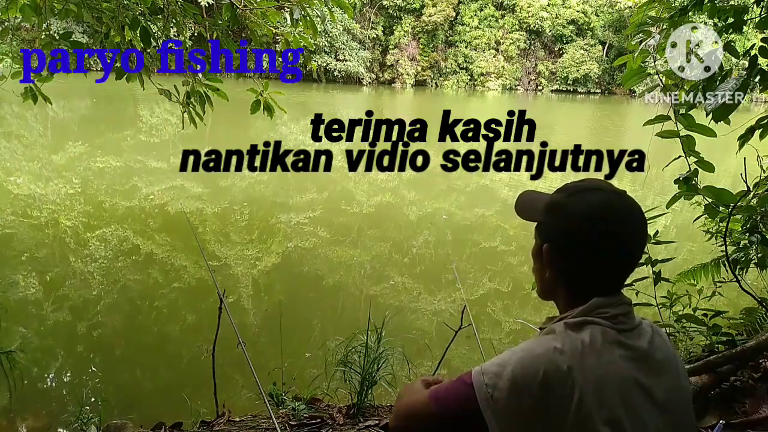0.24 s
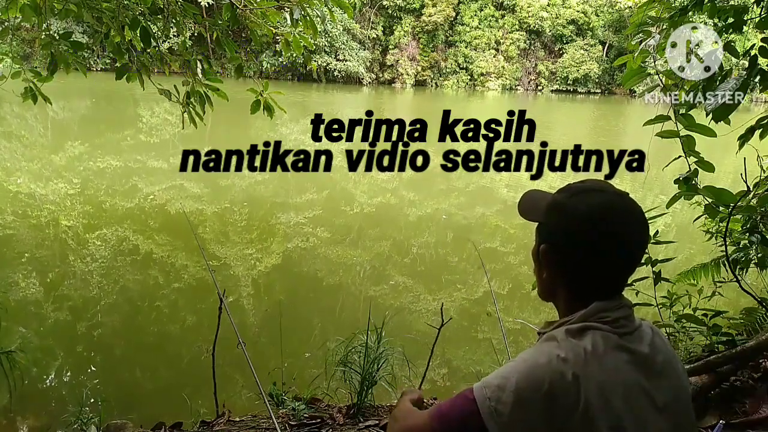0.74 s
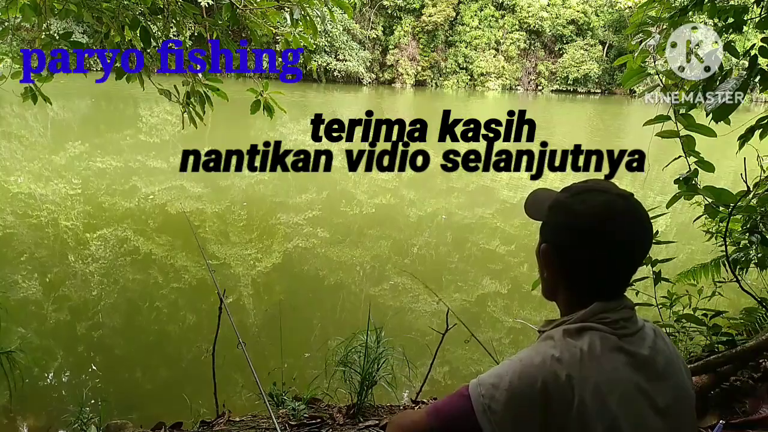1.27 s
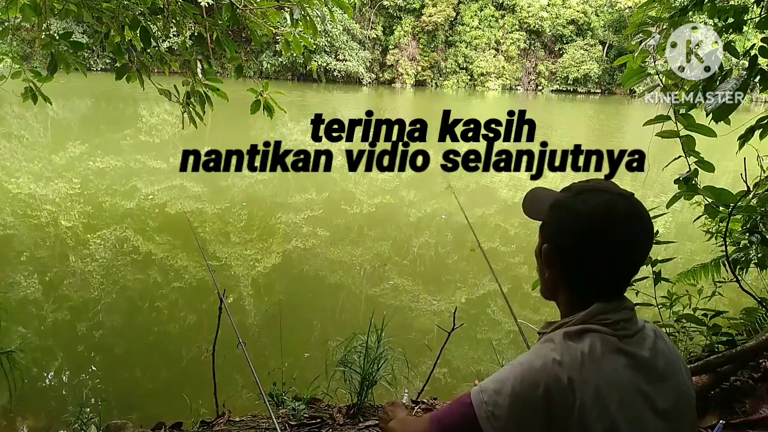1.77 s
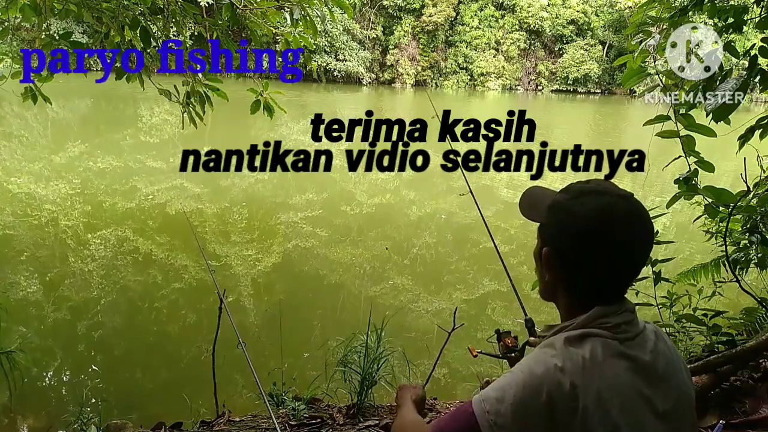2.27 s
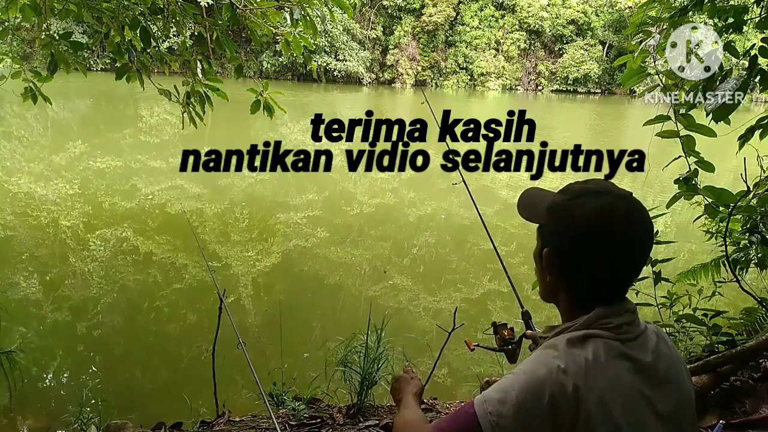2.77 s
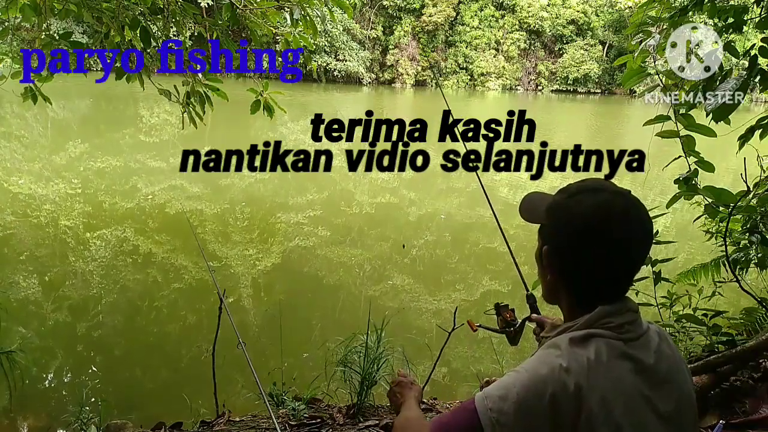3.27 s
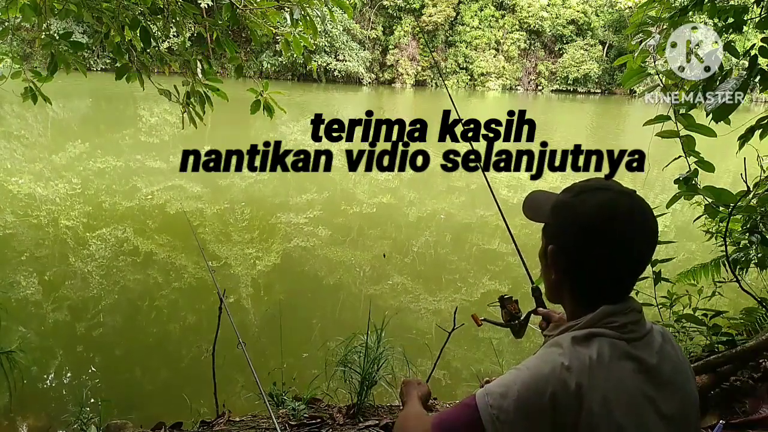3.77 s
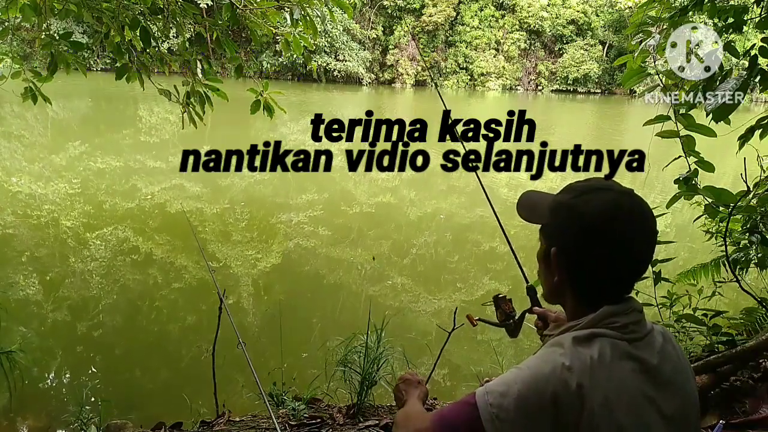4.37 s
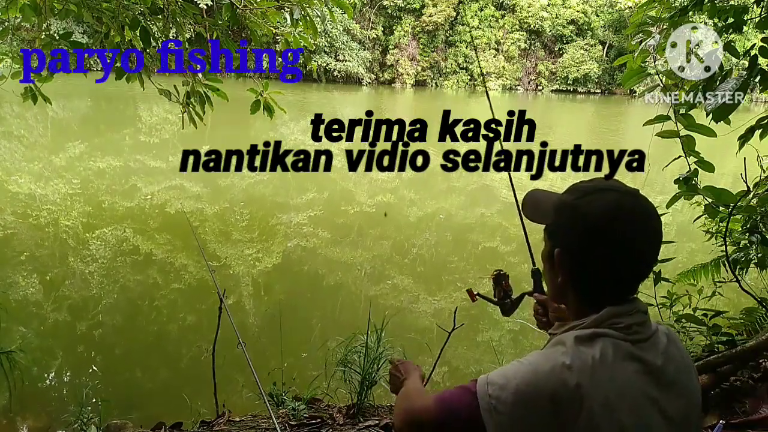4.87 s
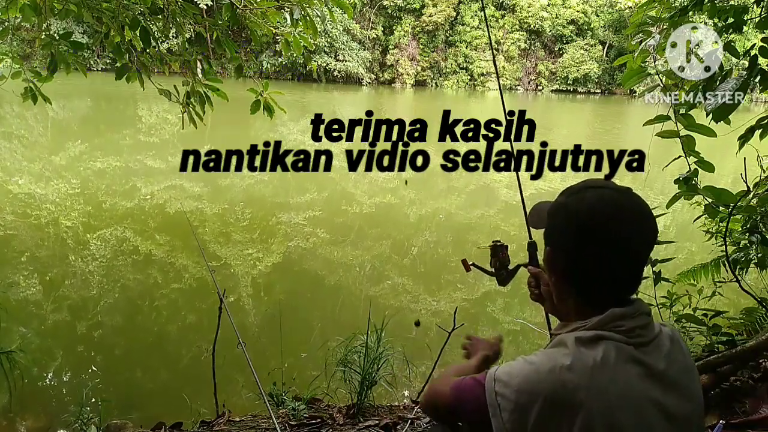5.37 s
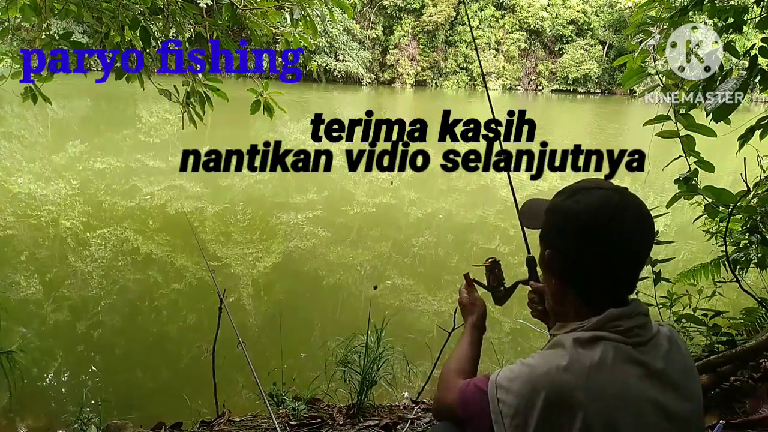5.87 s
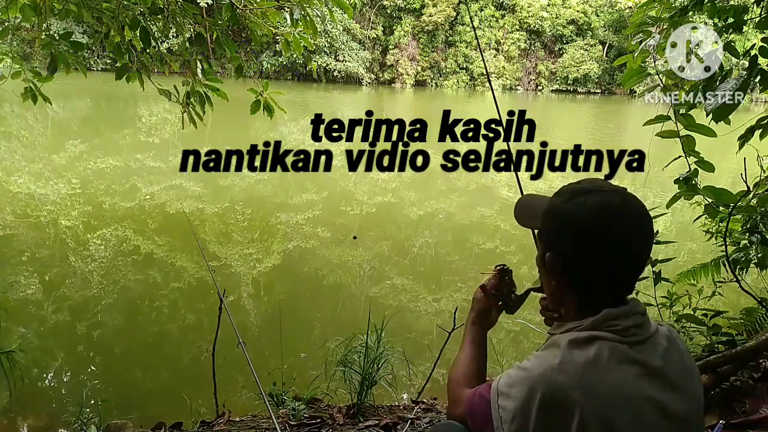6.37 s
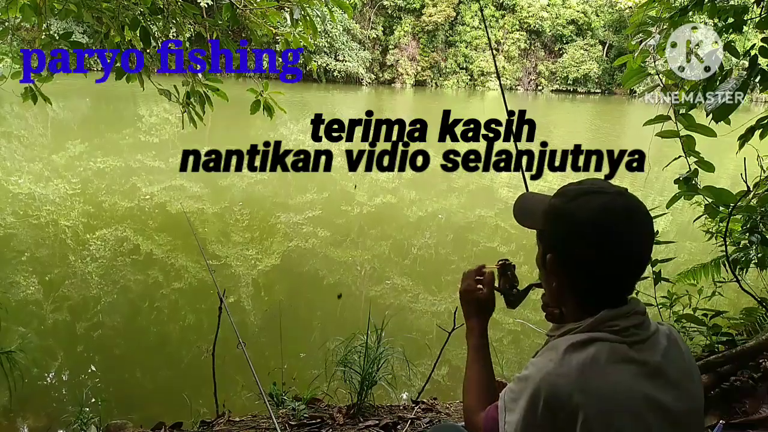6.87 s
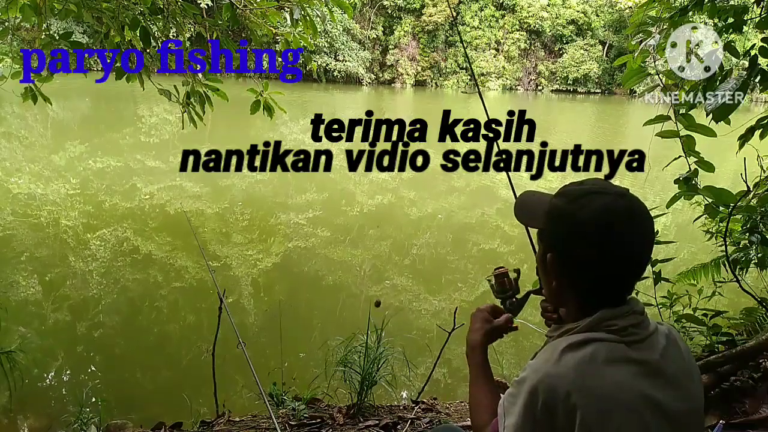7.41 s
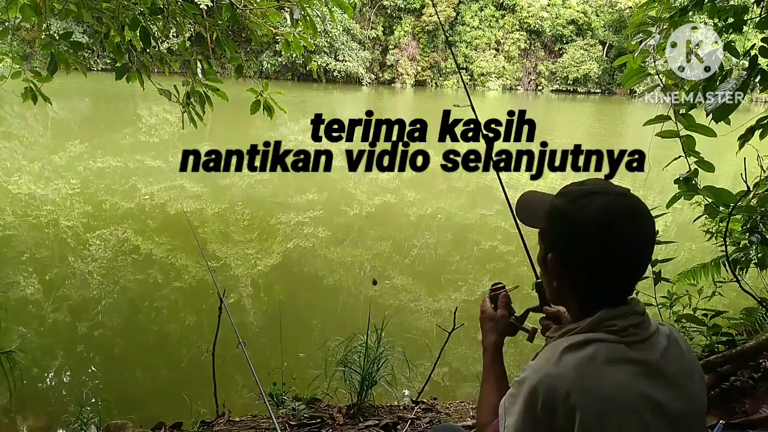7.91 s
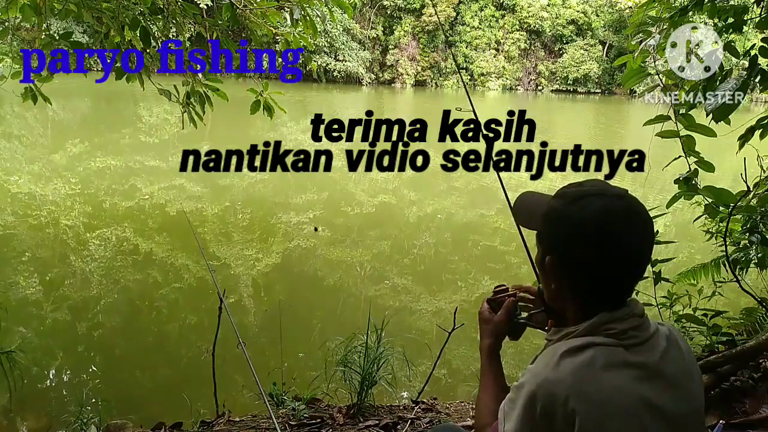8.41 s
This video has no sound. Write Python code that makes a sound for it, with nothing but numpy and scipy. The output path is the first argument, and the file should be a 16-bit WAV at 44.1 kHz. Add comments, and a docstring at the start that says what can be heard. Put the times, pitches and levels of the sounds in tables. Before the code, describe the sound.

A steady high insect buzz fills a lakeside forest, with repeated bird whistles, a brief chuckling call and a low rumble of air.

```python
"""Insects and birds at a forest lake

Crickets trill with their wings and cicadas drone with their tymbals, over a low rumble of moving air.
One bird repeats a chip and a high falling whistle; a second calls lower notes, and a third slurs
and chuckles. An angler's tackle knocks softly near by. Trunks and leaves scatter the birds' calls
and the knocks into reverberation."""
import sys
import numpy as np
from scipy import signal
from scipy.fft import rfft, irfft, next_fast_len
from scipy.io import wavfile
from scipy.ndimage import map_coordinates

SR = 44100
rng = np.random.default_rng(int(sys.argv[2]) if len(sys.argv) > 2 else 0)


def persist_wave(psi):
    """Save psi, clipped to +-1, as 16-bit WAV."""
    counts = np.round(np.clip(psi, -1, 1) * 32767).astype(np.int16)
    wavfile.write(sys.argv[1], SR, np.atleast_2d(counts).T)


N = 381465


def amp(db):
    """Decibels to amplitude ratio."""
    return 10 ** (np.asarray(db) / 20)


def unit(x):
    """Normalisation to rms 1."""
    return x / np.sqrt(np.mean(x ** 2) + 1e-20)


def clock(length):
    """Sample times over a length in seconds."""
    return np.arange(round(length * SR)) / SR


def along(points, hz):
    """Interpolation on a logarithmic frequency axis."""
    freqs, values = np.transpose(points)
    return np.interp(np.log(hz + 1), np.log(freqs + 1), values)


def curves(rows, t):
    """Linear interpolation at t of each column after the first."""
    times, *columns = np.transpose(rows)
    return [np.interp(t, times, column) for column in columns]


def wobble(rate):
    """Smooth random modulation, with rate knots a second."""
    return map_coordinates(rng.standard_normal(int(N * rate / SR) + 4), [np.arange(N) * rate / SR])


def swell(t, crest_s, rise_s, fall_s):
    """Exponential growth to 1 at the crest, then exponential decay."""
    return np.exp(np.minimum((t - crest_s) / rise_s, (crest_s - t) / fall_s))


def phase(hz):
    """Phase is the time integral of frequency."""
    return 2 * np.pi * np.cumsum(hz) / SR


def add(track, s, sound):
    """Superposition of a sound on a track at time s."""
    part = track[max(round(s * SR), 0):][:len(sound)]
    part += sound[:len(part)]


def filtered(x, response):
    """Filtering multiplies the spectrum by a frequency response."""
    size = next_fast_len(N + 8192)
    return irfft(rfft(x, size) * response(np.fft.rfftfreq(size, 1 / SR)), size)[..., :N]


def bell(hz, centre, width):
    """A Gaussian power spectrum of area 1; width is taken at half power."""
    sigma = width / np.sqrt(8 * np.log(2))
    return np.exp(-((hz - centre) / sigma) ** 2 / 2) / (sigma * np.sqrt(2 * np.pi))


def panned(x, left_db):
    """An interaural level difference: louder on the left by left_db."""
    return x * amp([[left_db / 2], [-left_db / 2]])


# Likeness of the two channels. Each row: frequency in Hz, correlation coefficient.
COHERENCE = [(30, -0.086), (65, 0.63), (130, 0.078), (500, 0.2), (1200, -0.066), (3000, 0.029),
             (10000, 0.019)]
def diffuse(gain):
    """A diffuse field: noise of rms 1 from all round, only partly coherent between the ears."""
    def response(hz):
        angle = np.arccos(np.clip(along(COHERENCE, hz), -1, 1)) / 2
        return gain(hz) * np.array([np.cos(angle), np.sin(angle)])
    mid, side = filtered(rng.standard_normal((2, N)), response)
    return unit(np.array([mid + side, mid - side]))


def broadband(spectrum):
    """Diffuse noise coloured by a spectrum in dB."""
    return diffuse(lambda hz: amp(along(spectrum, hz)))


def narrowband(centre_hz, width_hz):
    """Diffuse noise confined to one Gaussian band."""
    return diffuse(lambda hz: np.sqrt(bell(hz, centre_hz, width_hz)))


# The forest's decay. Each row: frequency in Hz, reverberation time in seconds.
FOREST_T60 = [(300, 0.13), (1000, 1), (4000, 1), (10000, 0.072)]
def forest(x, direct_db, echo_db, build_s=0.003):
    """Reverberation: scattering by trunks and leaves builds a decaying tail behind the direct sound."""
    hz, t, noise = signal.stft(rng.standard_normal((2, SR)), SR, nperseg=256)
    envelope = amp(-60 * t / along(FOREST_T60, hz)[:, None]) * (1 - np.exp(-t / build_s))
    tail = signal.istft(noise * envelope, SR, nperseg=256)[1]
    echo = signal.fftconvolve(x[None], tail / np.linalg.norm(tail[0]), axes=1)[:, :N]
    return amp(direct_db) * x + amp(echo_db) * echo


# Two spectra of moving air. Each row: frequency in Hz, relative spectral density in dB.
RUMBLE_SPECTRUM = [(4, 8), (10, 2), (20, -4.5), (30, -4.5), (45, -10), (100, -28.5), (220, -50),
                   (400, -103)]
RUSH_SPECTRUM = [(50, -9.5), (130, 3.5), (250, -2.5), (430, -5.5), (680, -12.5), (1200, -20), (2500, -32.5),
                 (6000, -60)]
def moving_air(t):
    """Flow noise: a randomly modulated rumble and a soft rush, both slowly easing."""
    rumble = amp(-45 - 0.12 * t) * unit(amp(1.64 * wobble(14)) * broadband(RUMBLE_SPECTRUM))
    rush = amp(-61 - 0.3157 * t) * broadband(RUSH_SPECTRUM)
    return panned(rumble, left_db=3.5 * -1) + panned(rush, left_db=-0.5)


# The drone's colour. Each row: frequency in Hz, relative spectral density in dB.
DRONE_SPECTRUM = [(25, -28), (45, -4), (62, -3), (75, -3.5), (92, -12), (130, -18), (260, -54.5),
                  (400, -95)]
# Its envelope. Each row: time in seconds, relative level in dB.
DRONE_ENVELOPE = [(0.0, -55), (0.58, -59), (1.88, -55.5), (1.93, -61), (2.36, -55), (5.03, -55.5),
                  (5.47, -59.5), (8.65, -56)]
def far_drone(t):
    """Low-frequency noise whose level dips now and then."""
    gain = amp(curves(DRONE_ENVELOPE, t)[0] + 0.5)
    return panned(gain * broadband(DRONE_SPECTRUM), left_db=-3.5)


# Distant insects. Each row: frequency in Hz, relative spectral density in dB.
CHORUS_SPECTRUM = [(600, -32), (1300, -7.5), (1900, -3), (2500, -1.5), (2850, 0), (3200, 2), (3750, 2),
                   (4100, -2.5), (4600, -4.5), (6000, -6), (8600, -2), (10100, -3.5), (10800, -19),
                   (11400, -64)]
def far_insects(t):
    """Incoherent summation: countless insects merge into a hiss, and a crowd of crickets swells once."""
    chorus = amp(-63) * broadband(CHORUS_SPECTRUM)
    crowd_gain = amp(-82) + amp(-66) * swell(t, crest_s=1.3, rise_s=1.1, fall_s=0.79)
    return chorus + crowd_gain * narrowband(3570, width_hz=380)


def far_cicada(t):
    """A distant rasp: narrowband noise that grows and decays exponentially."""
    return amp(-72.5) * swell(t, crest_s=6.3, rise_s=0.57, fall_s=0.41) * narrowband(5760, width_hz=330)


# The whine's envelope. Each row: time in seconds, relative level in dB.
SIREN_ENVELOPE = [(0.0, -76.5), (0.82, -70.5), (1.59, -72.5), (3.81, -68.5), (8.55, -69.5), (8.65, -68)]
def siren_cicada(t, centre_hz=9225, sink_hz_per_s=13, swing_hz=75, period_s=1.63, crest_s=3.48):
    """Frequency modulation: a narrow whine swings slowly up and down while it sinks."""
    shift_hz = swing_hz * np.cos(2 * np.pi * (t - crest_s) / period_s) - sink_hz_per_s * t
    analytic = signal.hilbert(narrowband(centre_hz, width_hz=150))
    whine = np.real(analytic * np.exp(1j * phase(shift_hz)))
    return amp(curves(SIREN_ENVELOPE, t)[0] + 5) * whine


def throbbing_cicada(beat_hz=19.6, throb_db=0.84, buzz_db=1.5):
    """Amplitude modulation: tymbal clicks blur into a band that throbs, four or five clicks a beat."""
    beat = phase(beat_hz * (1 + 0.0078 * wobble(2.7)))
    modulation_db = throb_db * np.cos(beat) + buzz_db * (np.cos(4 * beat) + np.cos(5 * beat)) / 2
    band = narrowband(7370, width_hz=800)
    return panned(amp(-57) * unit(band * amp(modulation_db)), left_db=3)


def wing_tones(rows):
    """Multipath propagation through the trees smears each wing tone into a fluttering line."""
    def density(hz):
        return sum(amp(db) ** 2 * bell(hz, centre, width) for centre, width, db in rows)
    power = sum(amp(db) ** 2 for _, _, db in rows)
    return np.sqrt(power) * diffuse(lambda hz: np.sqrt(density(hz)))


# Spectral lines of the songs. Each row: frequency in Hz, line width in Hz, relative level in dB. # The high
# lines also hold a steady line near 8.9 kHz, just below the siren cicada's whine.
LOW_CRICKET_LINES = [(2973, 43, 1), (3020.5, 36, -1)]
TRILL_LINES = [(5202, 20, -3), (5303, 46, -5), (5040, 30, -14), (5270, 52, -11)]
KATYDID_LINES = [(14211, 18, -2), (14255, 40, -7), (14170, 20, -9)]
HIGH_LINES = [(8870, 150, -77), (9800, 160, -89), (13426, 50, -85.5), (13647, 27, -84.5), (14200, 57, -90),
              (13800, 840, -81.5)]
# Envelopes of two of these songs. Each row: time in seconds, relative level in dB.
LOW_CRICKET_ENVELOPE = [(0, -63.5), (2, -65), (4.3, -64), (5, -63.5), (6.4, -64), (8.65, -65.5)]
KATYDID_ENVELOPE = [(0.0, -84), (0.07, -82), (2.84, -83), (2.94, -81), (4.26, -86), (4.5, -75), (5.28, -87),
                    (5.85, -80), (7.39, -89), (7.61, -80), (7.73, -86), (8.65, -74)]
def wing_singers(t, settle_s=3):
    """Stridulation: loud low crickets, a thin trill that settles and a katydid; steady high lines ring beside
    them, one just below the siren cicada's whine."""
    low = amp(curves(LOW_CRICKET_ENVELOPE, t)[0]) * wing_tones(LOW_CRICKET_LINES)
    trill = amp(-74 + 7 * np.exp(-t / settle_s)) * wing_tones(TRILL_LINES)
    katydid = amp(curves(KATYDID_ENVELOPE, t)[0] + 5.5) * wing_tones(KATYDID_LINES)
    return low + trill + katydid + wing_tones(HIGH_LINES)


# Nearer crickets. Each row: frequency in Hz, relative level in dB.
NEAR_TONES = [(3357, -77.5), (3408, -75), (3457, -76), (3548, -70.5), (3569, -76), (3681, -84)]
# They ease off and return. Each row: time in seconds, gain in dB.
NEAR_ENVELOPE = [(0, 3.5), (3.2, 2.5), (5.1, -0.5), (6.2, -1), (6.8, 3), (8.65, 2)]
def near_crickets(t, wander_hz=4, fade_db=1.5):
    """Almost sinusoidal wing tones that wander and fade independently at each ear."""
    def ear(hz):
        fading = amp(fade_db * wobble(4))
        angle = phase(hz + wander_hz * wobble(25)) + rng.uniform(-0.42, 1)
        return unit(fading * np.sin(angle))
    tones = sum(amp(db) * np.array([ear(hz), ear(hz)]) for hz, db in NEAR_TONES)
    return amp(curves(NEAR_ENVELOPE, t)[0]) * tones


def chirping_cricket(t, wing_hz=5249, chirp_hz=8.94, last_s=0.57):
    """Full amplitude modulation cuts a wing tone into slightly uneven chirps, which stop early on."""
    cycle = 2 * np.pi * chirp_hz * (t - last_s) + 0.5 * wobble(5.3)
    chirps = (1 + np.cos(cycle)) / 2 * (t < last_s + 0.5 / chirp_hz)
    wing = np.sin(2 * np.pi * wing_hz * t)
    return forest(amp(-65) * chirps * wing, direct_db=1, echo_db=-11)


# Knocks of the tackle. Each row: start in seconds, ring frequency in Hz, relative level in dB.
TACKLE_KNOCKS = [(.145, 770, -63.5), (.582, 680, -62.5), (5.397, 760, -60.5), (5.562, 770, -59),
                 (5.878, 2040, -64), (7.467, 494, -59)]
def tackle(ring_t60_s=0.023, tick_t60_s=0.025, tick_db=-6, cutoff_hz=2200):
    """Impact excitation: each knock is one damped mode under a dull tick of noise."""
    track, t = np.zeros(N), clock(0.1)
    for s, hz, db in TACKLE_KNOCKS:
        ring = amp(-60 * t / ring_t60_s) * np.sin(2 * np.pi * hz * t)
        tick = amp(tick_db - 60 * t / tick_t60_s) * rng.standard_normal(len(t))
        add(track, s, amp(db) * (ring + tick))
    dulled = filtered(track, lambda hz: 1 / (1 + (hz / cutoff_hz) ** 2))
    return forest(dulled, direct_db=9.5, echo_db=-4)


def voice(pitch, rough, rate):
    """Random frequency modulation: the pitch trembles by the share rough, rate times a second."""
    knots = np.arange(len(pitch)) * rate / SR
    tremble = map_coordinates(rng.standard_normal(int(knots[-1]) + 4), [knots])
    return np.sin(phase(pitch * (1 + rough * tremble)))


def slur(start_hz, end_hz, length, rough, rate):
    """A glide: one side of the syrinx holds its pitch, slides down and levels off."""
    progress = clock(length) / length
    pitch = start_hz * (end_hz / start_hz) ** np.interp(progress, [0.22, 0.72], [0, 1])
    return signal.windows.tukey(len(pitch), 0.45) * voice(pitch, rough, rate)


# Partials of a cluck. Each row: frequency in Hz, relative level in dB.
CLUCK_PARTIALS = [(640, 1), (955, -0.5), (1700, -10), (2550, -6)]
def cluck(length_s=0.023, fall=0.065):
    """Inharmonic partials fall together in one short, hoarse syllable."""
    progress = clock(length_s) / length_s
    glide = 1 + fall * (0.5 - progress)
    partials = np.zeros(len(glide))
    for hz, db in CLUCK_PARTIALS:
        gain = amp(db + rng.normal(0, 3))
        partials += gain * voice(hz * glide * rng.normal(1, 0.015), rough=0.056, rate=580)
    return np.sin(np.pi * progress) * partials


# A clear voice and a hoarse one. Each row: start and length in seconds, first and last pitch in Hz,
# relative level in dB, roughness as a share of pitch, trembles per second.
SLURS = [(2.105, .088, 1018, 597, -64.5, 0.044, 464), (2.108, 0.057, 3100, 1611, -59, 0.126, 1200)]
# Runs of clucks. Each row: start and length in seconds, relative level at the end in dB.
CLUCK_RUNS = [(2.239, .27, -64), (3.034, 0.11, -77), (3.433, .14, -69.5)]
def chuckling_bird(clucks_per_s=32, growth_db_per_s=36, scatter_s=0.004):
    """Biphonation: both sides of the syrinx slur at once; uneven, growing runs of clucks follow."""
    song = np.zeros(N)
    for s, length, start_hz, end_hz, db, rough, rate in SLURS:
        add(song, s, amp(db) * slur(start_hz, end_hz, length, rough, rate))
    for s, length, db in CLUCK_RUNS:
        for delay in np.arange(0, length, 1 / clucks_per_s):
            gain = amp(db - growth_db_per_s * (length - delay))
            add(song, s + delay + rng.normal(0, scatter_s), gain * cluck())
    return forest(song, direct_db=4, echo_db=1.5)


def figure(notes, s, db):
    """A bird's set figure of short exponential frequency sweeps, sung at time s."""
    song = np.zeros(N)
    for delay, length, start_hz, end_hz, note_db in notes:
        pitch = np.geomspace(start_hz, end_hz, len(clock(length)))
        envelope = amp(db + note_db) * signal.windows.tukey(len(pitch), 0.5)
        add(song, s + delay, envelope * voice(pitch, rough=0.03, rate=550))
    return song


# The call. Each row: delay and length in seconds, first and last pitch in Hz, relative level in dB.
CALL_NOTES = [(0, 0.091, 2780, 2814, -7.5), (.09, 0.13, 3110, 3190, -2.5), (.185, .07, 2810, 2720, -1.5)]
# Its entries. Each row: start in seconds, relative level in dB.
CALL_TIMES = [(3.389, -61.5), (8.411, -59)]
def calling_bird():
    """A low-high-low pitch contour of three notes, sung twice."""
    return sum(figure(CALL_NOTES, s, db) for s, db in CALL_TIMES)


# A chip, an upward flick into a bright note. Each row: delay and length in seconds,
# first and last pitch in Hz, relative level in dB.
CHIP_NOTES = [(-.024, .044, 2520, 3350, -7), (0, .036, 3676, 3890, -0.5)]
# The course of a whistle. Each row: share of its length, pitch ratio, relative level in dB.
WHISTLE_CONTOUR = [(0, 1.035, -14), (.17, 1.01, -9.5), (.35, .995, -4.5), (.68, 1.003, -5.5),
                   (.79, .975, -2), (.89, .938, 3.5), (1, .925, -12.5)]
# The phrases. Each row: start in seconds, relative chip level in dB, whistle delay and length
# in seconds, relative whistle level in dB.
WHISTLER_PHRASES = [(0.041, -56, 0.2, .305, -54), (1.316, -57, 0.19, 0.27, -54),
                    (2.395, -54, .215, .36, -56.5), (3.734, -56, 0.24, .255, -55.5),
                    (5.089, -61.5, .165, .32, -57.5), (6.513, -61.5, 0.17, .26, -60.5),
                    (8.153, -62.5, .25, 0.21, -60)]
def whistling_bird(whistle_hz=4284, sag_hz_per_s=35):
    """Frequency-modulated song: a chip, then a falling whistle, each a little lower than the last."""
    song = np.zeros(N)
    for s, chip_db, delay, length, whistle_db in WHISTLER_PHRASES:
        ratio, contour_db = curves(WHISTLE_CONTOUR, clock(length) / length)
        whistle = voice((whistle_hz - sag_hz_per_s * s) * ratio, rough=0.0184, rate=340)
        envelope = amp(whistle_db + contour_db) * signal.windows.tukey(len(whistle), 0.1)
        add(song, s + delay, envelope * whistle)
        song += figure(CHIP_NOTES, s, chip_db)
    return song


def scene():
    """Linear superposition of air, insects, birds and tackle."""
    t = np.arange(N) / SR
    cicadas = throbbing_cicada() + siren_cicada(t) + far_cicada(t)
    background = moving_air(t) + far_drone(t) + far_insects(t)
    crickets = wing_singers(t) + near_crickets(t) + chirping_cricket(t)
    birds = forest(calling_bird() + whistling_bird(), direct_db=-3, echo_db=-0.5, build_s=0.005)
    return background + cicadas + crickets + birds + chuckling_bird() + tackle()


def record(dry, top_hz=14850):
    """Band limiting: an ideal low-pass filter keeps nothing above top_hz."""
    return filtered(dry, lambda hz: hz < top_hz)


dry = scene()
out = record(dry)
persist_wave(out)
```